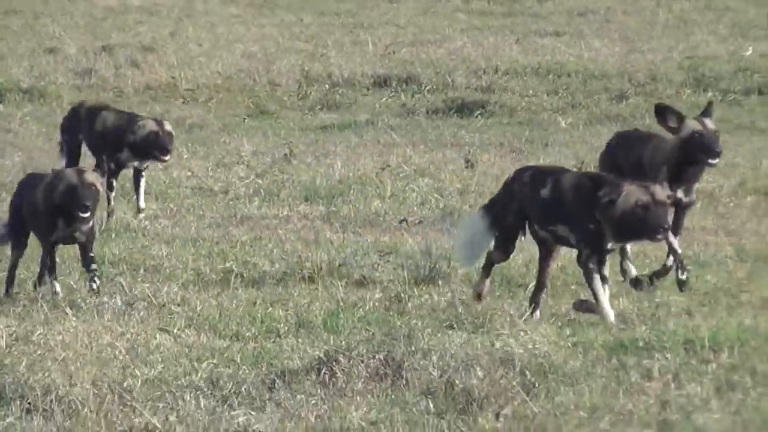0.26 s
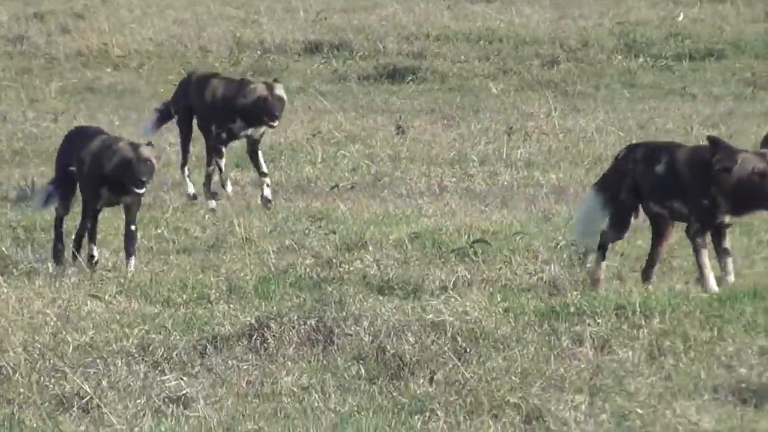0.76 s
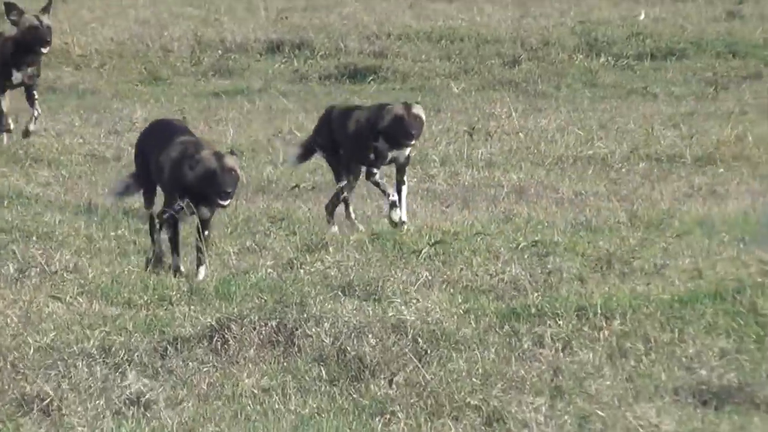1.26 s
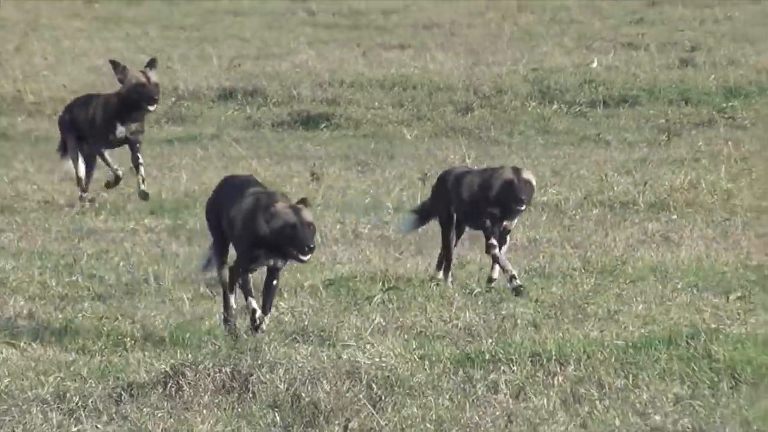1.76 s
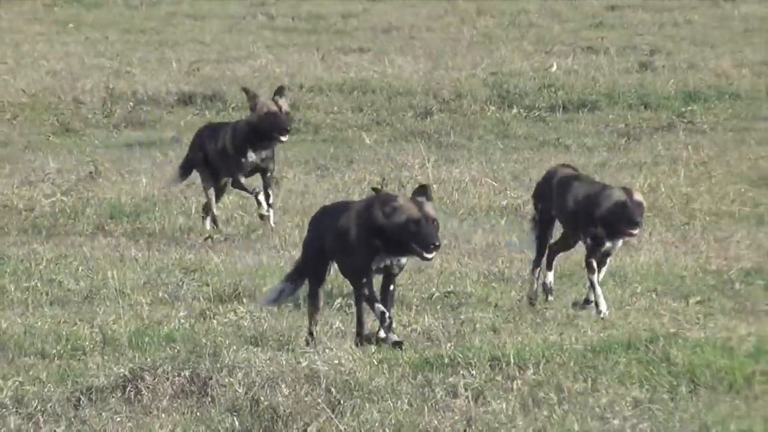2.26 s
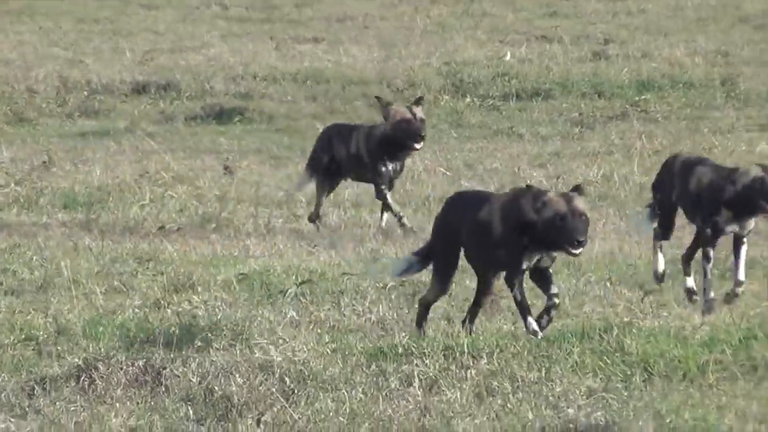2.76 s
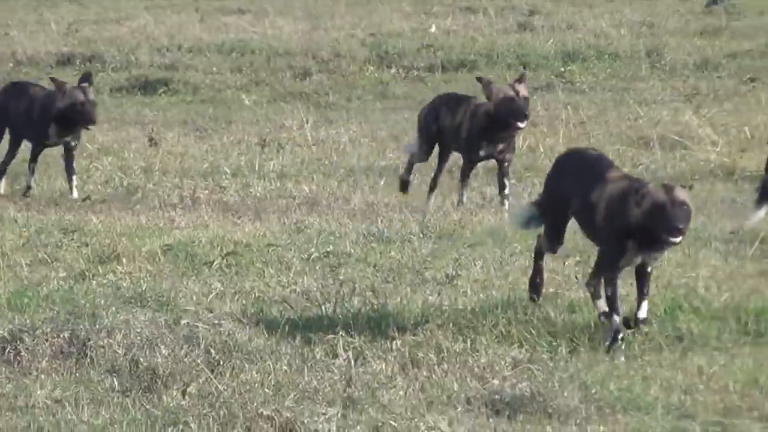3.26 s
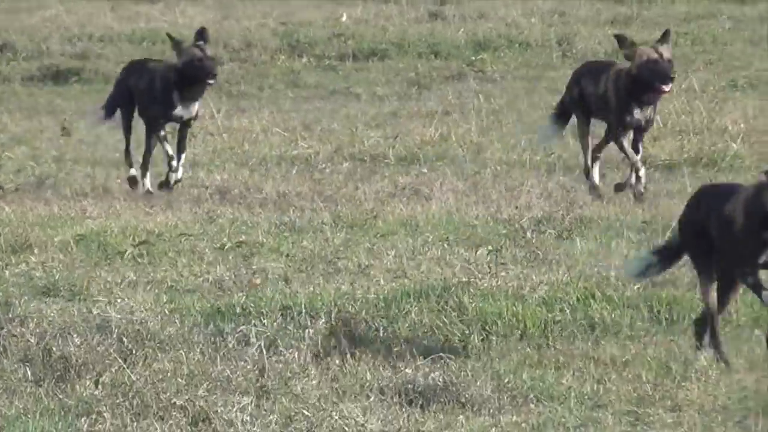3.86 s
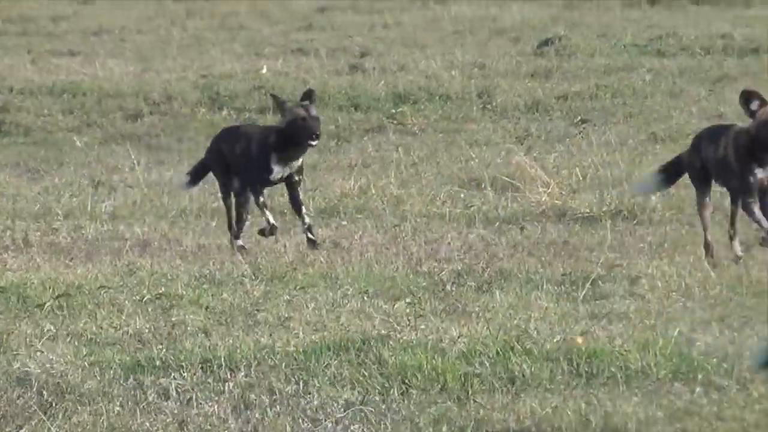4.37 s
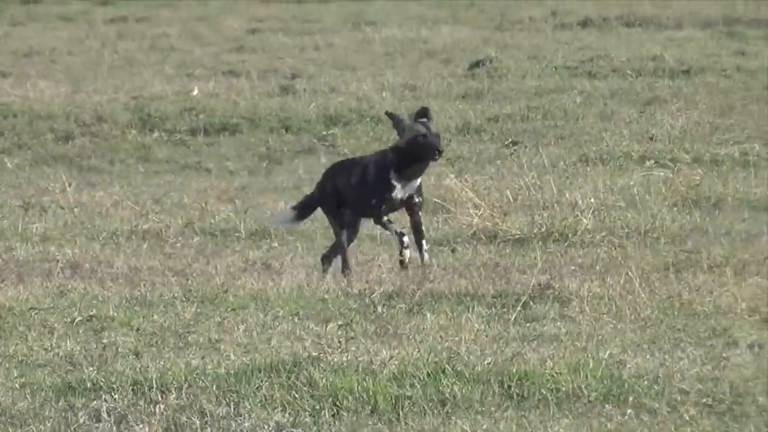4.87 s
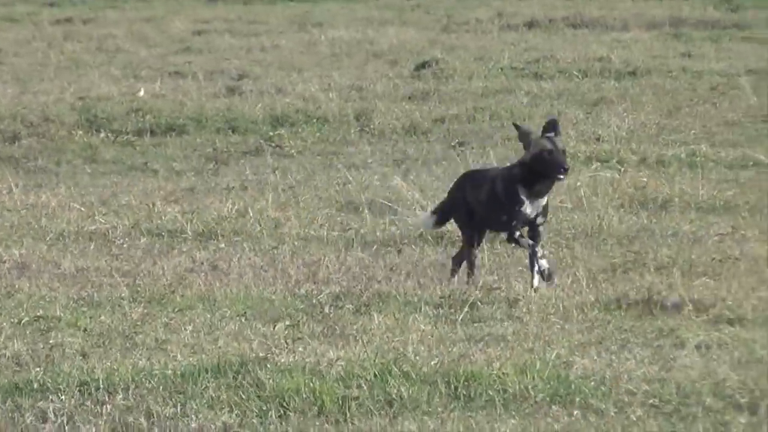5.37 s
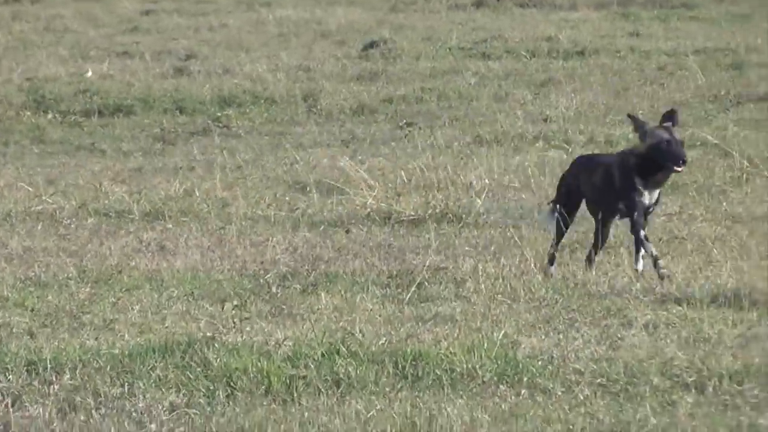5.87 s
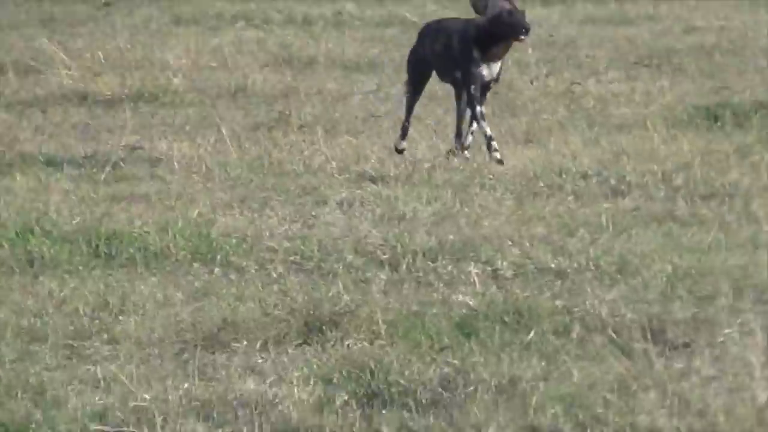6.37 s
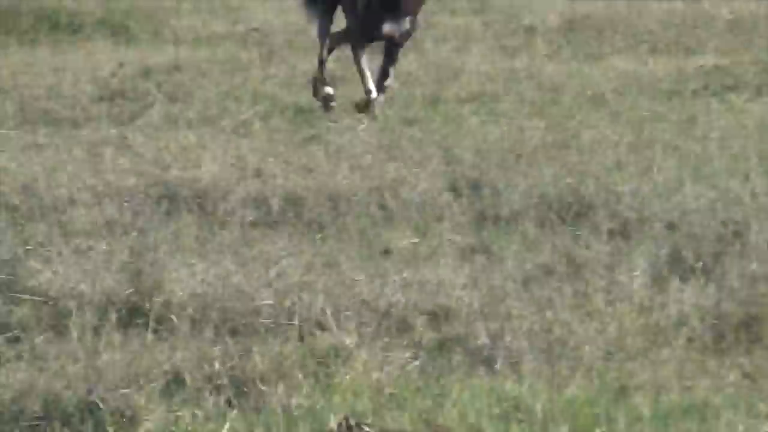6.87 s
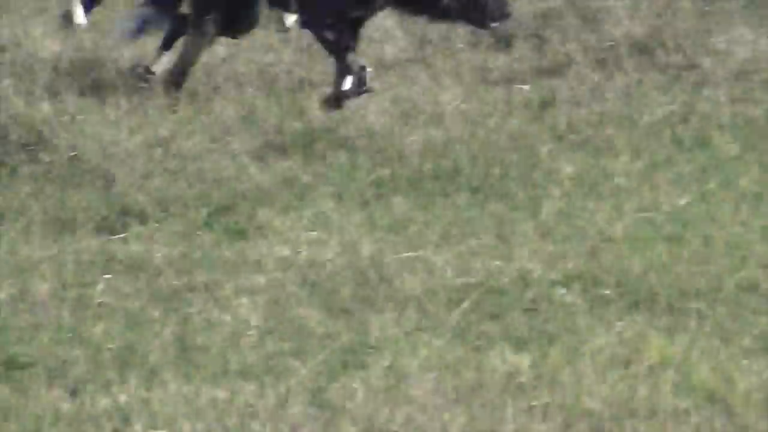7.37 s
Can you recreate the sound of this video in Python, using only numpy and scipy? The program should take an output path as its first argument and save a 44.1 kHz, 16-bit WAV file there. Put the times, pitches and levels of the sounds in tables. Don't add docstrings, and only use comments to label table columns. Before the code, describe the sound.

Excited wild dogs chirp and whine in quick overlapping whistles that thin to single calls, while low wind rumbles and slaps the microphone.

```python
import sys
import numpy as np
from scipy import signal
from scipy.fft import rfft, irfft, next_fast_len
from scipy.io import wavfile
from scipy.ndimage import uniform_filter1d

SR = 44100
rng = np.random.default_rng(int(sys.argv[2]) if len(sys.argv) > 2 else 0)


def invert_db(x):
    u = np.asarray(x, float) / 20
    return 10 ** u


def store_wav(level_fs):
    pcm = np.round(np.clip(np.atleast_2d(level_fs), -1, 1) * 32767)
    wavfile.write(sys.argv[1], SR, pcm.T.astype(np.int16))


N = 336483


def evened(x):
    return x / np.sqrt(np.mean(x ** 2) + 1e-20)


def read(points, hz):
    f, value = np.transpose(points)
    return np.interp(np.log(hz + 1), np.log(f + 1), value)


def add(mix, s, sound):
    part = mix[..., max(round(s * SR), 0):][..., :sound.shape[-1]]
    part += sound[..., :part.shape[-1]]


def drift(count, hz):
    raw = rng.standard_normal(count // 2048 * 2048 + 6000)
    slow = signal.sosfilt(signal.butter(2, hz, fs=SR, output="sos"), raw)
    return evened(slow[3900:][:count])


def coloured(x, points):
    size = next_fast_len(N)
    gain = invert_db(read(points, np.fft.rfftfreq(size, 1 / SR)))
    return evened(irfft(rfft(x, size) * gain, size)[..., :N])


# top in seconds, climb in seconds, top in Hz,
# level in dB, closing fall in Hz.
CHIRPS = [(0.024, 0.027, 2910, -34.5, 430), (0.064, 0.022, 2846, -39.5, 520),
          (1.815, 0.025, 2870, -49.5, 300), (3.066, 0.013, 2700, -50, 400), (5.432, 0.017, 3155, -50, 600),
          (.205, .01, 2720, -41, 100), (5.745, 0.014, 3070, -53, 693), (0.233, 0.039, 2730, -40, 332),
          (0.276, 0.035, 2860, -37, 400), (0.418, 0.036, 2743, -37.5, 420), (0.535, 0.079, 2890, -42, 400),
          (0.65, .025, 2760, -53.5, 480), (0.779, 0.021, 2770, -38.5, 418),
          (0.999, 0.034, 2724, -39.5, 400), (1.006, 0.02, 2920, -43.5, 450), (1.243, 0.032, 2970, -45, 580),
          (1.425, 0.026, 2736, -37, 400), (1.485, 0.025, 2836, -37.5, 280), (2.06, 0.055, 2865, -42, 382),
          (2.15, 0.03, 2670, -41.5, 448), (2.385, 0.1, 2826, -42, 200), (3.55, .012, 3050, -49.5, 100),
          (2.692, .012, 3050, -44.5, 250), (2.404, .015, 2620, -47, 260), (2.475, 0.05, 2780, -51.5, 250),
          (3.772, 0.044, 2875, -47, 300), (5.115, .025, 2783, -36.5, 680), (6.06, 0.019, 3040, -49, 250),
          (.416, .02, 2950, -46, 300), (1.79, .035, 2855, -38, 300), (.765, 0.021, 2900, -45.5, 350),
          (2.134, .012, 2980, -47, 690), (2.95, .035, 2870, -50, 690)]
SWEEPS = [(0.598, 0.057, 2300, 2800, -37.5), (0.94, 0.13, 2180, 2817, -44),
          (2.148, 0.072, 2450, 2703, -45.5), (5.113, .085, 2200, 2780, -43), (1.21, 0.089, 2224, 2770, -39),
          (1.66, 0.089, 2234, 2710, -43.5), (1.905, 0.077, 2150, 2673, -43),
          (2.678, .095, 2180, 2616, -45.5), (2.838, 0.11, 2490, 2800, -51), (2.94, .095, 2030, 2680, -45),
          (3.27, 0.11, 2127, 2764, -47), (5.385, 0.12, 1980, 2784, -39.5), (5.64, 0.098, 1994, 2700, -45)]
STRAGGLER = [(3.6, 0.13, 2170, 2860, -45), (3.915, 0.13, 2136, 2793, -46),
             (4.235, 0.125, 2120, 2800, -45.5), (6.415, .11, 2103, 2814, -46.5),
             (4.532, 0.11, 2120, 2853, -43), (4.835, 0.122, 2087, 2900, -46.5),
             (5.9, 0.108, 2060, 2980, -43.5), (7.135, 0.108, 1986, 2957, -40.5)]
YELPS = [(1.792, 0.11, 2100, 2862, -39), (6.15, 0.11, 2026, 2804, -46), (6.645, 0.095, 2100, 2800, -47),
         (6.88, 0.1, 2006, 2936, -47.5), (7.358, 0.099, 2030, 2910, -45), (7.562, .09, 2000, 3000, -46.5)]
WHINES = [(0.322, .085, 2220, 2570, -44.5), (.11, .06, 3050, 3170, -49.5), (.595, 0.06, 2120, 2450, -48),
          (3.2, 0.059, 1400, 2550, -48), (5.7, 0.13, 2480, 3000, -55), (.865, 0.065, 3120, 3350, -48),
          (1.9, .065, 3100, 2900, -51), (3.13, 0.055, 2600, 3100, -53), (3.35, 0.033, 1750, 2100, -52),
          (2.65, .05, 2100, 2900, -52), (0.89, 0.08, 1500, 2080, -47), (1, .06, 2220, 2600, -44.5),
          (2.255, 0.037, 1900, 2200, -51), (2.295, .035, 2830, 3200, -48.5), (1.1, 0.043, 1700, 2480, -46),
          (1.185, .075, 3150, 3800, -51), (1.96, 0.04, 1750, 2400, -47), (3.2, .06, 2050, 3300, -46),
          (7.09, .03, 2250, 2200, -43)]
HOARSE = [(1.76, .1, 1850, 2050, -48), (2.06, 0.11, 2376, 2480, -42.5), (7.1, .06, 2050, 2504, -45.5),
          (1.88, .05, 2700, 3070, -53), (3.575, 0.064, 3300, 3900, -54.5), (4.21, 0.053, 3400, 3810, -56.5),
          (4.44, .1, 1950, 2156, -48.5), (.985, 0.072, 2250, 2570, -48.5), (2.36, 0.091, 2900, 3360, -51.5),
          (2.675, 0.074, 3040, 3500, -49), (3.25, 0.11, 3040, 3410, -51), (.52, 0.074, 2900, 3310, -52),
          (1.2, 0.094, 3000, 3510, -49.5), (5.89, 0.053, 2900, 3196, -50), (0.205, 0.05, 2054, 2615, -43),
          (0.6, 0.04, 2290, 2595, -43), (0.76, 0.076, 2120, 2640, -45.5), (1.201, 0.045, 2280, 2630, -47),
          (1.441, .11, 1900, 2580, -42.5), (1.74, 0.14, 2184, 2487, -47.5), (2.07, 0.14, 1940, 2205, -46),
          (2.68, .14, 2007, 2650, -49), (2.935, 0.07, 2300, 2593, -47.5), (3.22, 0.1, 2550, 2756, -44.5),
          (3.429, 0.17, 1976, 2650, -51.5), (3.765, 0.1, 2560, 2830, -45.5), (4.1, .145, 2050, 2250, -50),
          (4.47, 0.17, 2157, 2402, -43), (5.111, 0.17, 1780, 2594, -45), (5.429, 0.038, 2456, 2850, -49),
          (5.74, 0.079, 2350, 2696, -43.5), (4.52, 0.086, 2950, 3380, -51), (6.05, 0.14, 2200, 2570, -44.5),
          (6.34, 0.14, 1890, 2204, -50.5),
          (.14, .07, 2300, 2470, -53.5), (.39, .07, 2470, 2570, -39.5), (.4, 0.1, 3150, 3350, -53),
           (.7, 0.052, 2500, 2700, -52), (.95, .08, 2350, 2490, -49), (1.77, 0.055, 3050, 3400, -49),
           (2.07, 0.13, 3100, 3300, -49), (2.13, .06, 2350, 2610, -47), (3.0, .05, 2350, 2410, -54.5),
           (3.01, .06, 2950, 3050, -57), (3.06, 0.057, 3250, 3550, -56), (3.13, .065, 1800, 2360, -53),
           (3.43, 0.057, 3150, 3600, -55.5), (4.37, .075, 2100, 2500, -48), (5.11, .07, 3000, 3350, -47),
           (7.53, .055, 1950, 2230, -51), (6.84, 0.057, 1900, 2500, -59), (2.33, .08, 1850, 2200, -52),
           (2.375, 0.037, 2400, 2500, -49), (2.6, 0.074, 1900, 2150, -53), (3.76, .14, 1950, 2200, -53),
           (4.08, .11, 1800, 1900, -55.5), (4.12, .06, 2850, 3100, -54.5), (5.36, .08, 1800, 2150, -51),
           (5.38, .05, 3100, 3400, -52), (5.68, .1, 2050, 2200, -52), (6.38, .07, 2800, 3250, -56),
           (6.62, 0.038, 2900, 3250, -54)]
SWEEP = dict(knee_at=.58, knee_up=.62, fall_s=0.0241, fall_hz=480,
             start_db=-11, knee_db=-1.5, top_db=0.5, end_db=-6)
PLUNGE = dict(knee_at=.46, knee_up=.5, fall_s=.027, fall_hz=954,
              start_db=-7.5, knee_db=1, top_db=-3.5, end_db=-6.5)
YELP = dict(knee_at=0.58, knee_up=.45, fall_s=0.0242, fall_hz=1000,
            start_db=-6, knee_db=-6, top_db=-0.5, end_db=-16)
WHINE = dict(knee_at=0.45, knee_up=.65, fall_s=0.0054, fall_hz=3,
             start_db=-5.5, knee_db=-5.5, top_db=-2.5, end_db=-1.5)
RASP = dict(knee_at=.52, knee_up=0.62, fall_s=0.0277, fall_hz=260,
            start_db=-11, knee_db=-4, top_db=0.56, end_db=-13.5)


def pack():
    dry, hoarse = np.zeros((2, N))
    clear_calls = [chirp(*row) for row in CHIRPS]
    for table, shape in ((SWEEPS, SWEEP), (STRAGGLER, PLUNGE), (YELPS, YELP), (WHINES, WHINE)):
        clear_calls += [arch(*row, **shape) for row in table]
    for rows in clear_calls:
        add(dry, *twitter(rows, rows[-3][0], jitter=.004, rattle=.27, breath_db=-18,
                          dark_db=-0.45, side_db=0, under_db=1.5))
    for rows in [arch(*row, **RASP) for row in HOARSE]:
        add(hoarse, *twitter(rows, rows[-2][0], jitter=.01, rattle=.72, breath_db=-15,
                             dark_db=-1, side_db=-1, under_db=-9))
    t = np.arange(3000) / SR
    scatter = rng.standard_normal((2, 3000)) * invert_db(-60 * t / 0.067) * (t > .002)
    scatter /= np.linalg.norm(scatter[0])
    port_lag_s = .00004
    direct = dry + np.array([np.roll(hoarse, round(port_lag_s * SR)), hoarse])
    grass = signal.oaconvolve((dry + hoarse)[None], scatter, axes=1)[:, :N]
    return direct * invert_db(np.array([[-1.2], [1.2]])) + invert_db(-6.0) * grass


def chirp(top_s, climb_s, top_hz, db, fall_hz):
    climb_hz_per_s, fall_s = 5500, 0.0214
    return [(top_s - climb_s, top_hz - climb_hz_per_s * climb_s, db - 5.5),
            (top_s, top_hz, db),
            (top_s + fall_s, top_hz - fall_hz, db - 6.5)]


def arch(top_s, climb_s, start_hz, top_hz, db,
         knee_at, knee_up, fall_s, fall_hz, start_db, knee_db, top_db, end_db):
    return [(top_s - climb_s, start_hz, db + start_db),
            (top_s - (1 - knee_at) * climb_s, start_hz + knee_up * (top_hz - start_hz), db + knee_db),
            (top_s, top_hz, db + top_db),
            (top_s + fall_s, top_hz - fall_hz, db + end_db)]


# frequency in Hz, level in dB.
THROAT = [(600, -34), (1000, -21.5), (1450, -11.5), (2000, -9.5), (2800, -8), (3400, -11.5), (4200, -13),
          (5500, -20), (7000, -24), (9000, -39.5)]
# time in seconds, upper partials' slope in dB per octave.
FACING = [(0, 0), (.6, 2.5), (1.2, 0.5), (1.7, -4.5), (2.5, -4.5), (3.2, -2.5), (4.0, 2), (4.6, 2.5),
          (5.1, -4), (5.9, 2.5), (6.6, 3), (7.6, 1)]


def twitter(rows, break_s, jitter, rattle, breath_db, dark_db, side_db, under_db):
    s, hz, db = np.transpose(rows)
    t = np.arange(s[0], s[-1], 1 / SR)
    fall_hz = hz[-2] - hz[-1]
    plunging = fall_hz >= 700
    if hz.max() < 2580 or fall_hz < 30:
        break_s = s[-1] + 1
    since_break = t - break_s

    last = np.clip((t - s[-2]) / (s[-1] - s[-2]), 0, 1)
    bend = (last - last ** 2) * max(fall_hz, 0) * 0.73
    near = np.clip((t - s[-3]) / (s[-2] - s[-3]), 0, 1)
    bend += (near - near ** 2) * (hz[-2] - hz[-3]) * 0.593 * (.6 if plunging else 1)
    pitch = uniform_filter1d(np.interp(t, s, hz) + bend, 300, mode="nearest")
    pitch *= 1 + jitter * drift(len(t), 130)

    dark_db = dark_db + (-9 if plunging else 1) * last + np.interp(s[-2], *np.transpose(FACING))
    shy_db = 77 * np.log2(np.maximum.accumulate(pitch) / pitch.max())

    low = 1 / (1 + np.exp(np.clip(since_break / 0.012, -30, 30)))
    peel = 1 + .15 * np.exp(np.minimum(since_break, 0) / .014)
    chaos = .25 * np.exp(-(since_break / .015) ** 2) * (break_s > s[0]) * (rattle < .5)

    beat = 2 * np.pi * np.cumsum(115 * (1 + .16 * drift(len(t), 25))) / SR
    grown = .15 + .85 * np.minimum((t - s[0]) / .06, 1)
    shake = grown * rattle * np.sin(beat + 1.78)

    whistle = 2 * np.pi * np.cumsum(pitch) / SR
    voice = (1 - chaos) * np.cos(whistle + 1.8 * shake)
    breath = np.cos(.9 * whistle) + np.cos(1.2 * whistle) + .5 * np.cos(1.45 * whistle)
    voice += invert_db(breath_db) * drift(len(t), 220) * breath

    # cycles per beat, share, fold rate, lift in dB, slope in dB per octave
    voices = ((3, low, pitch * peel / 3, 6.4, -17.5), (2, 1 - low, pitch / 2, 2.4, 2))
    for beats, share, fold_hz, lift_db, slope_db in voices:
        turn = 2 * np.pi * np.cumsum(fold_hz) / SR
        flicker = rng.standard_normal((3 * beats, 30))
        waver_db = [3 * np.interp(t - s[0], np.arange(30) / 70, row) for row in flicker]
        for k in range(1, 3 * beats + 1):
            if k == beats:
                continue
            octaves_up = max(np.log2(k / beats), 0)
            slope = slope_db + dark_db + shy_db * (k > 4 or beats == 2)
            tone_db = read(THROAT, k * fold_hz) + slope * octaves_up
            tone_db = tone_db + waver_db[k - 1] * (1 if k > beats else .5)
            tone_db = tone_db + lift_db + side_db + under_db * (k < beats)
            voice += share * invert_db(tone_db) * np.cos(k * turn + k * k + shake)

    voice *= 1 + grown * rattle * np.cos(beat)
    voice *= 1 + (invert_db(-17) + chaos) * drift(len(t), 180)
    edge = np.clip(np.minimum((t - s[0]) / (1 + 2 * rattle), s[-1] - t) / .006, 0, 1)
    level_db = np.interp(t, s, db) + (last - last ** 2) * max(db[-2] - db[-1], 0)
    return s[0], np.sqrt(2) * invert_db(level_db + 2.0 * drift(len(t), 72)) * voice * edge


# frequency in Hz, level in dB per Hz.
RUMBLE = [(8.8, -20), (15, -10.5), (54, -2), (103, 0), (130, -2), (162, -4), (258, -14), (500, -36),
          (650, -36.5), (1100, -120)]
# frequency in Hz, level in dB per Hz.
FLUTTER = [(60, -64), (150, -10.5), (250, 0.5), (400, -6), (700, -16.5), (1200, -30.5), (2500, -65)]
# time in seconds, level in dB.
GUSTY = [(0, -12.5), (2.6, -10.5), (3.7, -17.5), (4.2, -19), (5.5, -23.5), (7.0, -29.5), (7.63, -18.5)]
# time in seconds, peak in dB.
SLAPS = [(0.143, -20.5), (0.212, -8.5), (0.656, -12), (0.704, -10.5), (0.782, -10), (0.957, -7),
         (1.016, -11), (1.39, -6.5), (1.488, -1.5), (1.5, -19), (1.541, -11.5), (1.568, -9.5), (1.652, -12),
         (2.226, -24), (2.282, -10.5), (2.444, -12.5), (2.473, -4), (2.612, -13.5), (3.245, -21),
         (3.475, -20), (3.526, -13.5), (3.568, -12), (3.7, -22), (4.598, -6.5), (4.752, -23.5), (6.19, -40),
         (7.071, -23), (7.59, -4)]
# time in seconds, peak in dB.
SNAPS = [(0.146, -30), (0.191, -29), (0.213, -21.5), (0.658, -21.5), (0.682, -24), (0.7, -22), (0.778, -27),
         (0.794, -22), (0.828, -27), (0.946, -25), (0.958, -19), (1.02, -23), (1.08, -26), (1.389, -19),
         (1.469, -22), (1.49, -18), (1.54, -30), (1.57, -19.5), (1.655, -23), (1.833, -29.5), (2.08, -25.5),
         (2.226, -33), (2.267, -26), (2.283, -16), (2.433, -32), (2.444, -24), (2.48, -16.5), (2.522, -27),
         (2.577, -32), (2.601, -29), (2.657, -29), (3.09, -25), (3.13, -30), (3.245, -30), (3.309, -41),
         (3.327, -32), (3.386, -34), (3.413, -34.5), (3.475, -34), (3.53, -30), (3.568, -32), (3.712, -34),
         (3.837, -34), (4.6, -24), (4.752, -38), (6.714, -35), (7.575, -22), (7.593, -17.5)]


def wind():
    t = np.arange(N) / SR
    rumble_db = gusts(t)
    flutter_db = rumble_db + 0.19 * (rumble_db + 42.5) + np.interp(t, *np.transpose(GUSTY))
    lumps = drift(N, 23.4)
    a, b, c = rng.standard_normal((3, 3, N))
    rumble = coloured(ports(a[0], a[1:], 0.94, 0.00063) * invert_db(3.84 * lumps), RUMBLE)
    flutter_lumps = invert_db(3.17 * lumps + 2.6 * drift(N, 46))
    flutter = coloured(ports(b[0], b[1:], 0.77, 0.00066) * flutter_lumps, FLUTTER)

    blows, fronts = np.zeros((2, N))
    blow = np.exp(-t[:2000] / 0.011) * (1 - np.exp(-t[:2000] / 0.0005))
    for s, db in SLAPS:
        add(blows, s, invert_db(db + 16) * blow)
    band = signal.butter(3, [70, 380], "bandpass", fs=SR, output="sos")
    slaps = signal.sosfilt(band, ports(c[0] * blows, c[1:] * blows, 0.75, 0.0003))

    u = t[:600] / 0.00061
    swing = u * (2 - u) * np.exp(-u) * 3
    for (s, db), sign in zip(SNAPS, rng.choice([-1, 1], len(SNAPS))):
        add(fronts, s, sign * invert_db(db + 6.5) * swing)
    fronts = signal.sosfilt(signal.butter(2, 1050, fs=SR, output="sos"), fronts)
    snaps = np.array([fronts, np.roll(fronts, round(0.00056 * SR))])
    return rumble * invert_db(rumble_db) + flutter * invert_db(flutter_db) + slaps + snaps


# time in seconds, rumble in dB.
LULL = [(0.0, -26), (0.45, -41.5), (0.9, -33), (1.65, -27), (1.96, -30), (2.4, -29), (2.8, -31.5),
        (3.5, -26), (4.0, -35), (5.2, -35.5), (5.8, -24.5), (6.13, -50), (6.6, -33.5), (7.0, -25.5),
        (7.63, -28.5)]
# time in seconds, peak rumble in dB, seconds to lose 10 dB on either side.
GUSTS = [(0.21, -20, 0.08), (0.701, -20.5, 0.15), (0.97, -18, 0.13), (1.1, -23, 0.03), (1.21, -20, 0.05),
         (1.39, -30, 0), (1.49, -21.5, 0.09), (1.57, -16, 0.14), (2.28, -24, 0.15), (2.49, -21.5, 0.19),
         (2.629, -21, 0.08), (3.14, -22.5, 0.21), (3.27, -18.5, 0.08), (3.71, -20.5, 0.06),
         (3.87, -24.5, 0.03), (4.11, -26, 0.01), (4.27, -31.5, .09), (4.45, -26, 0.06),
         (4.592, -16.5, 0.04), (5.0, -23.5, 0.2), (5.32, -22.5, 0.11), (5.66, -23.5, 0.09),
         (5.94, -20, 0.1052), (6.2, -23, 0.04), (6.42, -23, 0.1), (6.76, -29, 0.1), (6.92, -26, 0),
         (7.079, -19, 0.02), (7.37, -21, 0.13), (7.63, -11, 0.1134)]


def gusts(t):
    s, db, fade_s = np.transpose(GUSTS)[..., None]
    slow = t[::64]
    lull_power = invert_db(np.interp(slow, *np.transpose(LULL))) ** 2
    gust_power = (invert_db(db - 10 * abs(slow - s) / fade_s) ** 2).sum(0)
    return np.interp(t, slow, 10 * np.log10(lull_power + gust_power))


def ports(shared, own, share, lag_s):
    share = np.clip(share, 0, 1)
    passing = np.array([shared, np.roll(shared, round(lag_s * SR))])
    return share * passing + np.sqrt(1 - share ** 2) * own


# time in seconds, level in dB, extra dB of the low ringing tones,
# pitch as a share of the usual.
TICKS = [
    (2.249, -49, 3, .99),
    (4.7268, -39, -30, .63),
    (6.7158, -9, -1, 0.97),
    (7.07, -46, -30.5, .99),
]
# frequency in Hz, level in dB, seconds to fall by 60 dB.
BODY = [(1170, -12, 0.01), (2050, -21, 0.026), (3370, -11.5, 0.018), (3900, -17, 0.025), (5000, -17, 0.017),
        (7720, -7, 0.0045), (11030, 12, 0.0018), (12500, -11, 0.003), (15000, -14, 0.0035)]


def camera():
    t, out = np.arange(2500) / SR, np.zeros(N)
    for s, tick_db, low_db, share in TICKS:
        ring = np.zeros(len(t))
        for hz, db, t60 in BODY:
            ring += invert_db(db + low_db * (hz < 6000) - 60 * t / t60) * np.sin(2 * np.pi * hz * share * t)
        onset = 1 - np.exp(-t / 0.00022)
        add(out, s, invert_db(tick_db) * ring * onset * (1.19 + 0.49 * drift(len(t), 1650)))
    return out * invert_db(np.array([[1.6], [-1.6]]))


# frequency in Hz, level in dB per Hz.
HISS = [(180, -34), (300, -30), (372, -13.5), (713, -10), (900, -8.5), (994, -13.5), (1870, -13.5),
        (2140, -18.5), (3190, -19.5), (5800, -24), (16000, -28)]
# frequency in Hz, likeness from 0 to 1.
HISS_SAME = [(400, 0.83), (1500, 0.54), (6000, 0.77), (10000, 0.84), (15000, 0.94)]


def hiss():
    hiss_db, scan_hz, scan_db = -52.5, 15734, -74
    frames, hz = N // 128 + 5, np.fft.rfftfreq(512, 1 / SR)
    a, b, c, d, patches = rng.standard_normal((frames, 257, 5)).T
    patches = evened(uniform_filter1d(uniform_filter1d(patches, 8, 0), 20, 1))
    same = np.clip(read(HISS_SAME, hz), -1, 1)[:, None]
    left = a + 1j * b
    right = same * left + np.sqrt(1 - same ** 2) * (c + 1j * d)
    z = np.array([left, right]) * invert_db(read(HISS, hz)[:, None] + 1.6 * patches)
    noise = evened(signal.istft(z, nperseg=512, noverlap=384)[1][:, :N])
    scan = np.sqrt(2) * invert_db(scan_db) * np.sin(2 * np.pi * scan_hz * np.arange(N) / SR)
    return invert_db(hiss_db) * noise * invert_db(np.array([[.9], [-.9]])) + scan


# start in seconds, length in seconds, pitch in Hz, level in dB.
COOS = [
    (6.22, 0.18, 898, -64),
    (6.467, 0.19, 883, -64.5),
]


def dove():
    out = np.zeros(N)
    for s, length, hz, db in COOS:
        t = np.arange(0, length, 1 / SR)
        add(out, s, invert_db(db + 7.5) * np.sin(2 * np.pi * hz * t) * np.sin(np.pi * t / length))
    return out


def scene():
    return pack() + wind() + hiss() + camera() + dove()


def top_cut(x):
    return signal.sosfilt(signal.butter(12, 16940, fs=SR, output="sos"), x)


def record(dry):
    power_db = 10 * np.log10(abs(uniform_filter1d((dry ** 2).mean(0), 200)) + 1e-12)
    fall = np.arange(N) * 300. / SR
    over_db = np.maximum(np.maximum.accumulate(power_db + fall) - fall + 17, 0)
    ducked = dry / invert_db(.5 * uniform_filter1d(over_db, 100))
    ducked = ducked * np.minimum(np.arange(N)[::-1] / 300, 1)
    treble_cut = signal.firwin(255, 16300, fs=SR)
    finished = signal.oaconvolve(ducked, treble_cut[None], "same", axes=1)
    return top_cut(finished)


dry = scene()
out = record(dry)
store_wav(out)
```